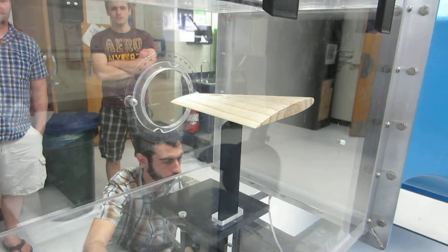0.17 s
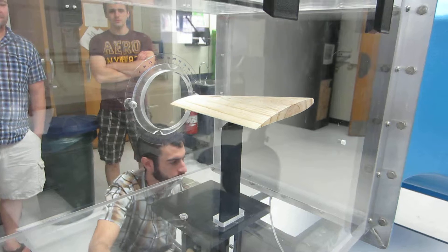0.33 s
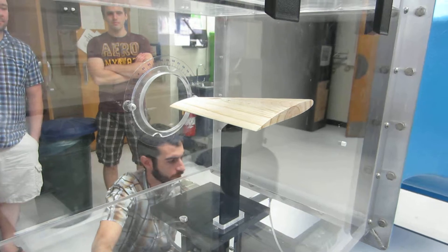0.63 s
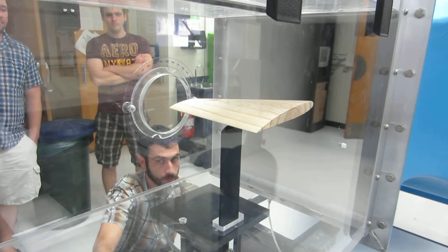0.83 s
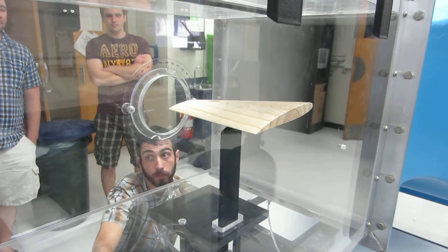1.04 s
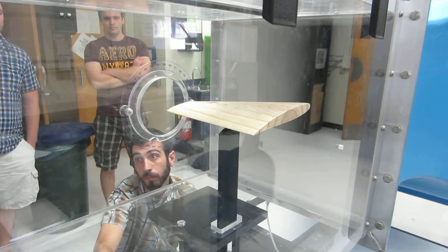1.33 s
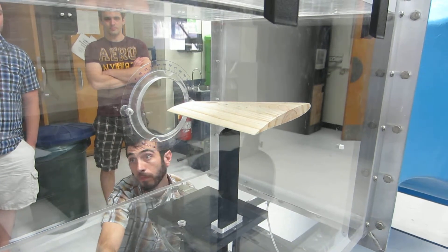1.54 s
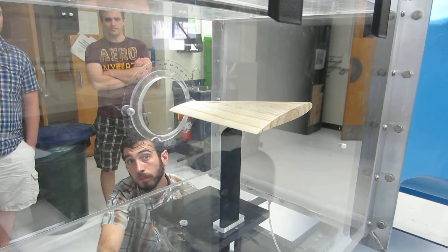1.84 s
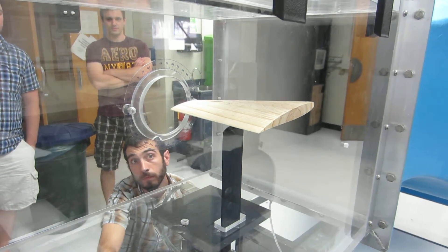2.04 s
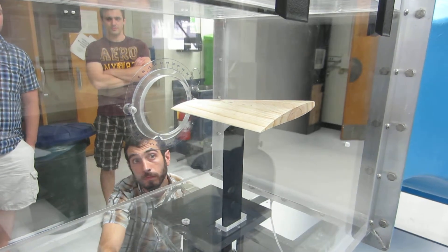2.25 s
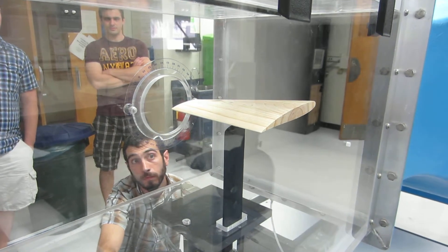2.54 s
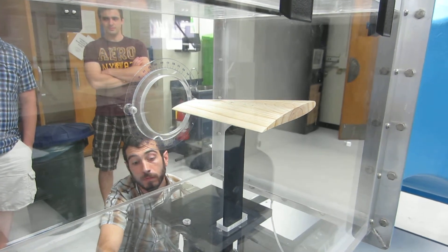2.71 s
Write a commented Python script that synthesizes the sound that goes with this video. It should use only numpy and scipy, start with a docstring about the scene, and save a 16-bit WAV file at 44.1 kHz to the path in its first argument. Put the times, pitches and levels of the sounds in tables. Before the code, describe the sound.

A wind tunnel roars in a laboratory, broad airflow over low rumble and swelling fan hum

```python
"""The sound cuts in abruptly, a little louder overall for an instant, and then a roar of air slowly eases. It
is a wind tunnel running at nearly steady speed in a laboratory, heard beside its test section. Turbulent air is
coloured noise: a broad rush over a low rumble, with resonances of the duct booming. The fan adds sines at
multiples of its shaft speed: a hum, a strong blade tone that swells and a thin whine."""
import sys
import numpy as np
from scipy import signal
from scipy.fft import rfft, irfft
from scipy.io import wavfile

SR = 44100
rng = np.random.default_rng(int(sys.argv[2]) if len(sys.argv) > 2 else 0)


def transcribe(signal):
    """Save signal, clipped to [-1, 1], as a 16-bit WAV file at the path in sys.argv[1]."""
    frames = np.atleast_2d(signal).T
    limited = np.clip(frames, -1, 1)
    pcm = np.round(limited * 32767).astype(np.int16)
    wavfile.write(sys.argv[1], SR, pcm)


N = 127008   # length [samples]

# The abrupt entry: its time [s], its extra level [dB] and how fast that extra fades [s].
START_S, START_EXTRA_DB, SETTLE_S = .0724, 5.5, 0.036
# Rushing air: level, low cut, flutter of the whole and flicker of each octave.
RUSH_DB, RUSH_LOW_HZ, RUSH_FLUTTER_DB, RUSH_PATCHY_DB = -21.5, 393, 0.43, 0.43
RUMBLE_DB, RUMBLE_PATCHY_DB = -28.5, 2.5
# Each fan tone is this many times the shaft speed; the blade tone's is the number of blades.
HUM_ORDER, BLADES, WHINE_ORDER = 2, 9, 35
# "Waver" shakes a tone's level, "wander" its pitch.
HUM_DB, HUM_WAVER_DB, HUM_WANDER_HZ = -33, 1.5, 0.28
HUM_FOLLOWS = 1.2   # change of the hum per change of the flow [dB per dB]
BLADE_WAVER_DB, BLADE_WANDER_HZ = 0.63, 0.47
WHINE_BELOW_BLADE_DB, WHINE_WAVER_DB, WHINE_WANDER_HZ = -17.5, 0, 1.37
CUTOFF_HZ = 15800   # almost nothing is left above this
# Reflections from the laboratory's walls: number, shortest and longest delay, level of each.
ECHO_COUNT, ECHO_NEAR_S, ECHO_FAR_S, ECHO_DB = 12, .008, .06, -26.5


def from_db(db):
    """Turn decibels into a gain."""
    return 10 ** (np.asarray(db) / 20)


def rms_one(x):
    """Scale a signal to an rms (average strength) of 1."""
    return x / np.sqrt(np.mean(x ** 2) + 1e-20)


def in_time(rows):
    """Join (time, value) points by straight lines, giving a value at every sample."""
    return np.interp(np.arange(N) / SR, *np.transpose(rows))


def drift(rate_hz):
    """Slow random movement with a spread of about 1: noise smoothed by a low-pass filter."""
    # Made at one point per 40 samples, then filled in between.
    r = np.exp(-80 * np.pi * rate_hz / SR)
    noise = rng.standard_normal(N // 40 + 2002)
    slow = signal.lfilter([1], [1, -2 * r, r * r], noise)[2000:]   # leave out the filter's start
    return np.interp(np.arange(N) / 40, np.arange(len(slow)), rms_one(slow))


def turbulence(spectrum, patchy_db, flicker_hz):
    """Noise of a given colour in which every octave flickers on its own; rms 1."""
    hz = np.maximum(np.arange(N // 2 + 1) * SR / N, 1)
    points_hz, points_db = np.transpose(spectrum)
    colour_db = np.interp(np.log(hz), np.log(points_hz), points_db)
    coloured = rfft(rng.standard_normal(N)) * from_db(colour_db)
    # Above the last point the level falls away.
    coloured = coloured / (1 + (hz / (2 * points_hz[-1])) ** 4)
    octave = np.floor(np.log2(hz))
    total = np.zeros(N)
    for k in range(4, 14):   # octaves from 16 Hz up to 16384 Hz
        band = irfft(coloured * (octave == k), N)
        total += band * from_db(patchy_db * drift(flicker_hz))
    return rms_one(total)


def resonance(hz, width_hz):
    """Noise passed twice through one resonance, so that it rings near one pitch; rms 1."""
    r = np.exp(-np.pi * width_hz / SR)
    section = [1 - r, 0, r - 1, 1, -2 * r * np.cos(2 * np.pi * hz / SR), r * r]
    ringing = signal.sosfilt([section, section], rng.standard_normal(N + SR))
    return rms_one(ringing[SR:])   # leave out the build-up


def tone(hz, waver_db, wander_hz):
    """A sine whose level and pitch are shaken by the air; rms 1 before the waver."""
    phase = 2 * np.pi * np.cumsum(hz + wander_hz * drift(8.2)) / SR
    sine = np.sqrt(2) * np.sin(phase + rng.uniform(0, 2 * np.pi))
    return sine * from_db(waver_db * drift(5.5))


def walls(x):
    """A dozen delayed copies put a fixed, fine ripple on the sound's colour."""
    lags = (rng.uniform(ECHO_NEAR_S, ECHO_FAR_S, ECHO_COUNT) * SR).astype(int)
    # A copy's end wraps round to the start.
    return x + from_db(ECHO_DB) * sum(np.roll(x, lag) for lag in lags)


def fan(flow_db):
    """Hum, blade tone and whine, each a multiple of the shaft speed."""
    # fan speed: (time [s], speed [turns per second])
    shaft_speed = [(0, 36.45), (.7, 36.63), (1.2, 36.83), (2.88, 36.82)]
    # strength of the blade tone: (time [s], level [dB])
    blade_level = [(.07, -27), (.55, -27), (.7, -21.5), (1.25, -18), (1.8, -19), (2.2, -22), (2.88, -19)]
    speed, blade_db = in_time(shaft_speed), in_time(blade_level)
    hum = tone(HUM_ORDER * speed, HUM_WAVER_DB, HUM_WANDER_HZ)
    hum = hum * from_db(HUM_DB + HUM_FOLLOWS * flow_db)
    blades = from_db(blade_db) * tone(BLADES * speed, BLADE_WAVER_DB, BLADE_WANDER_HZ)
    whine = tone(WHINE_ORDER * speed, WHINE_WAVER_DB, WHINE_WANDER_HZ)
    whine = whine * from_db(blade_db + WHINE_BELOW_BLADE_DB)
    return hum + blades + whine


def duct_boom():
    """Turbulence stirs the duct's resonances: each is noise ringing at its own pitch."""
    # duct resonances: (frequency [Hz], width of one filter pass [Hz], level at average flow [dB])
    modes = [(113.7, 9, -45.5), (130.8, 8.2, -35), (149, 10, -37.5), (203.6, 8.8, -35),
             (297.2, 15.8, -24.5), (348.1, 30.5, -26), (473, 22, -34.5), (548, 36, -35.5), (605, 14, -40),
             (687, 34, -37.5), (960, 40, -44), (1130, 36, -48), (1848, 45, -45.5)]
    return sum(from_db(db) * resonance(hz, width_hz) for hz, width_hz, db in modes)


def duct_rumble():
    """Low turbulent noise of the duct, with octaves that flicker strongly."""
    # colour of the rumble: (frequency [Hz], relative level per Hz [dB])
    colour = [(20, -27.5), (38, -16), (50, -3.5), (62, -7), (95, -9), (120, -3), (175, -2), (230, 3),
              (400, -4.5), (600, -25.5)]
    return from_db(RUMBLE_DB) * turbulence(colour, RUMBLE_PATCHY_DB, flicker_hz=12)


def air_rush():
    """Broad turbulent noise without its lows, reflected by the walls and fluttering slightly."""
    # colour of the rush before the low cut: (frequency [Hz], relative level per Hz [dB])
    colour = [(240, -33), (400, -5.5), (466, -1.5), (552, 0), (614, -3), (683, 0), (772, -4.5), (942, -4),
              (1070, -9.5), (1280, -11.5), (1360, -13.5), (1490, -15.5), (1820, -13.5), (2090, -16),
              (2630, -17.5), (3250, -21.5), (4220, -28.5), (5310, -29), (7210, -33.5), (9790, -45),
              (11400, -59.5), (13500, -56), (15500, -67)]
    low_cut = signal.butter(4, RUSH_LOW_HZ, "high", fs=SR, output="sos")
    air = signal.sosfilt(low_cut, turbulence(colour, RUSH_PATCHY_DB, flicker_hz=18))
    return rms_one(walls(air)) * from_db(RUSH_DB + RUSH_FLUTTER_DB * drift(16))


def airflow(flow_db):
    """Rush, rumble and booming duct rise and fall together with the flow."""
    return from_db(flow_db) * (air_rush() + duct_rumble() + duct_boom())


def scene():
    """Air and fan together, cutting in at once after a short silence."""
    # strength of the rushing air, of which only the changes count: (time [s], level [dB])
    flow_level = [(.1, -29), (.3, -29), (.75, -29), (.9, -30.5), (1.25, -30.5), (1.5, -30.5), (1.7, -30),
                  (2.05, -31), (2.25, -32.4), (2.55, -32), (2.88, -31.7)]
    flow_db = in_time(flow_level)
    flow_db = flow_db - flow_db.mean()
    since_start = np.arange(N) / SR - START_S
    extra_db = START_EXTRA_DB * np.exp(-np.maximum(since_start, 0) / SETTLE_S)
    entry = (since_start >= 0) * from_db(extra_db)
    return (entry * (airflow(flow_db) + fan(flow_db)))[None]


def record(dry):
    """Peaks are clipped at full scale, then a steep filter cuts the top of the treble."""
    top_cut = signal.ellip(12, .1, 80, CUTOFF_HZ, fs=SR, output="sos")
    return signal.sosfilt(top_cut, np.clip(dry, -1, 1))


dry = scene()
out = record(dry)
transcribe(out)
```